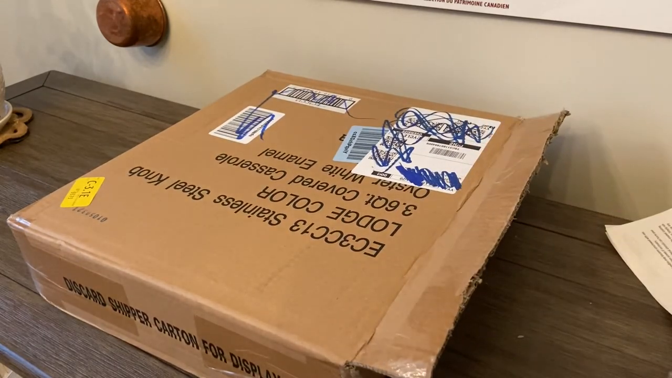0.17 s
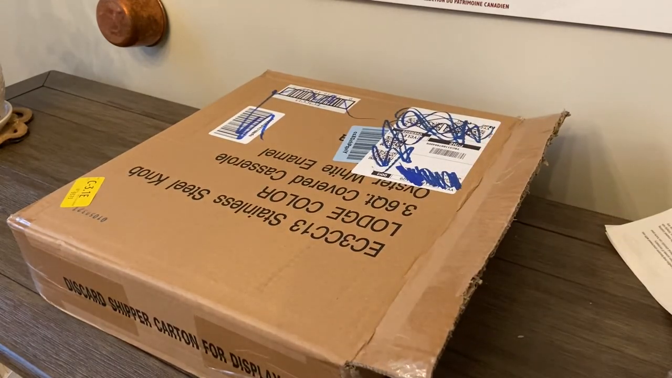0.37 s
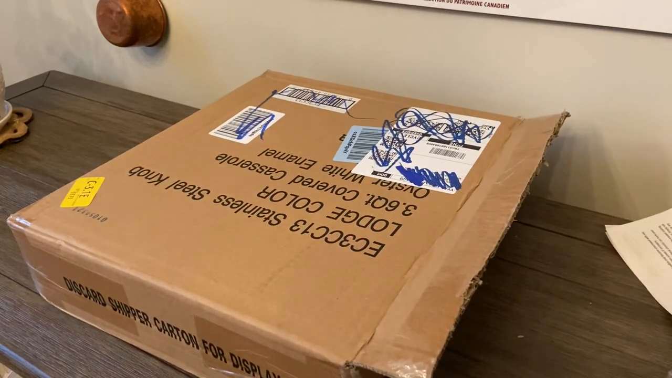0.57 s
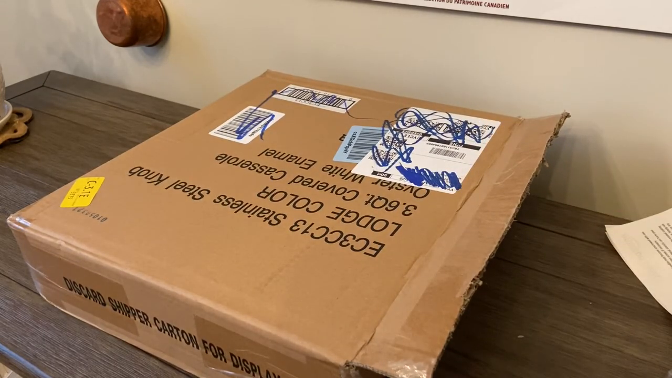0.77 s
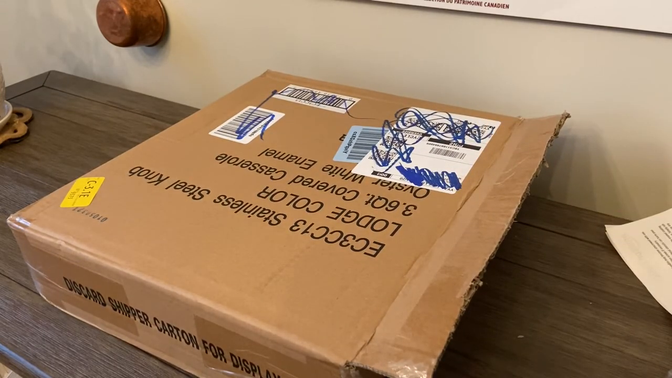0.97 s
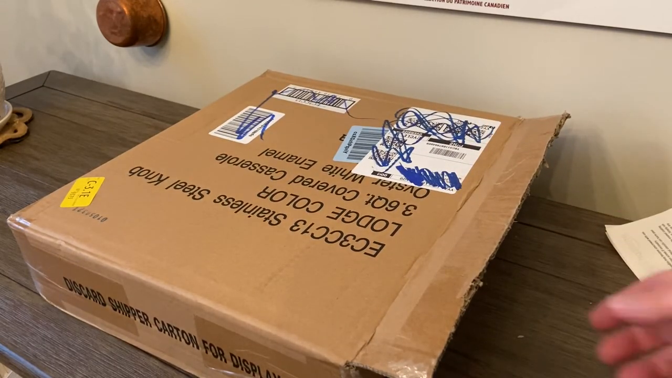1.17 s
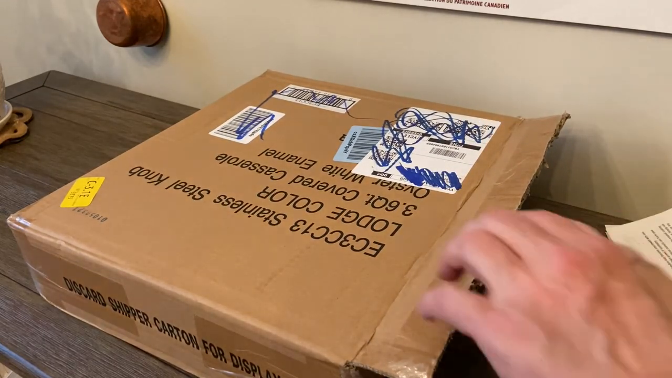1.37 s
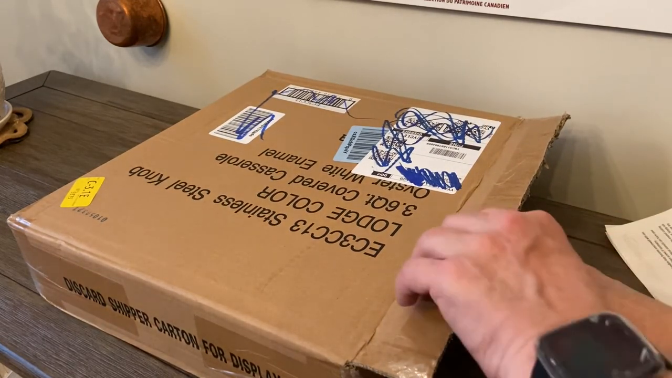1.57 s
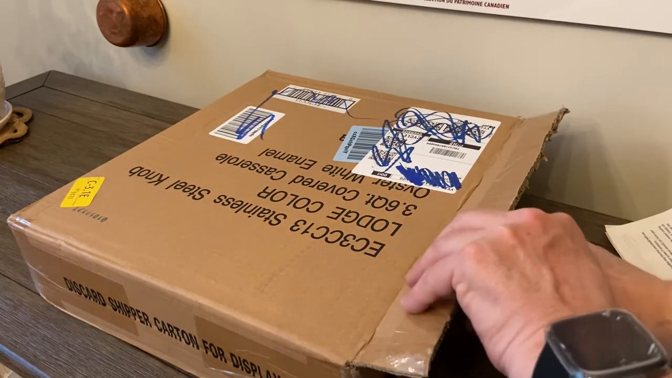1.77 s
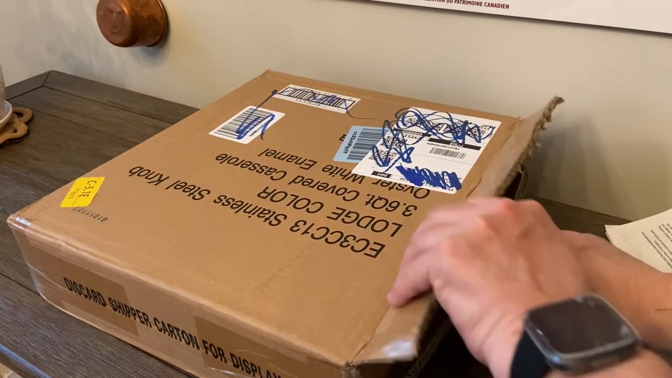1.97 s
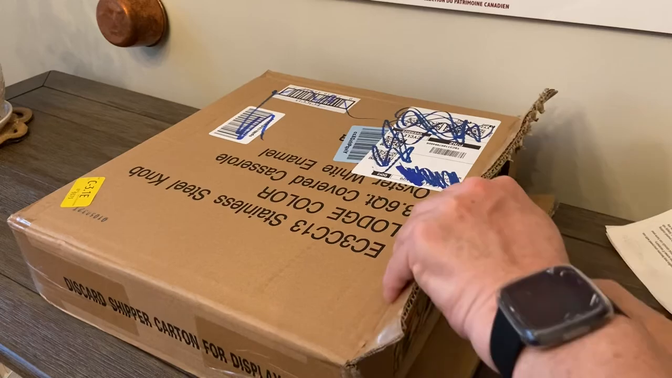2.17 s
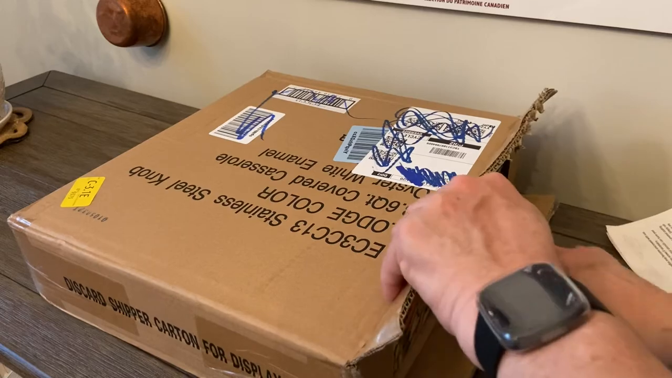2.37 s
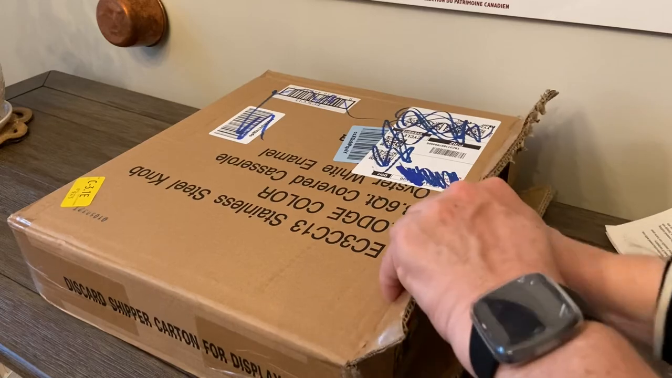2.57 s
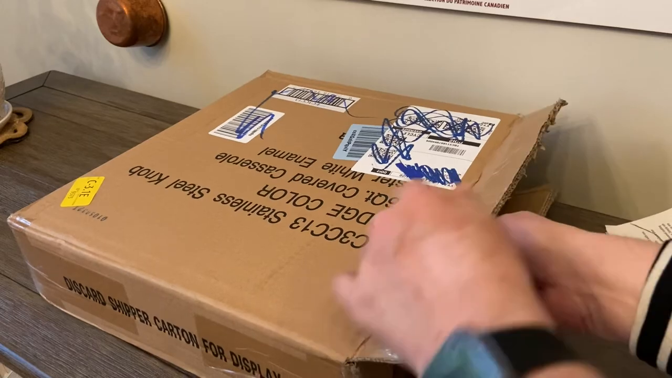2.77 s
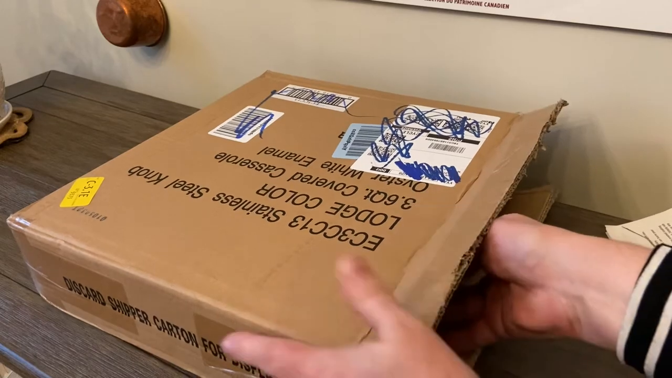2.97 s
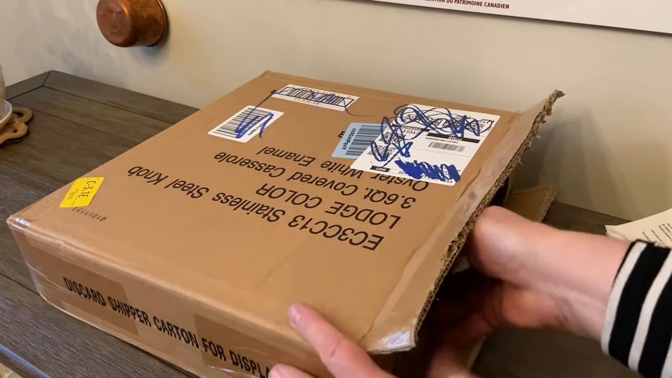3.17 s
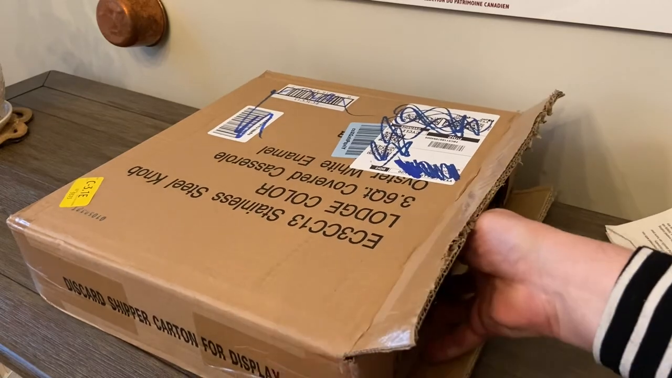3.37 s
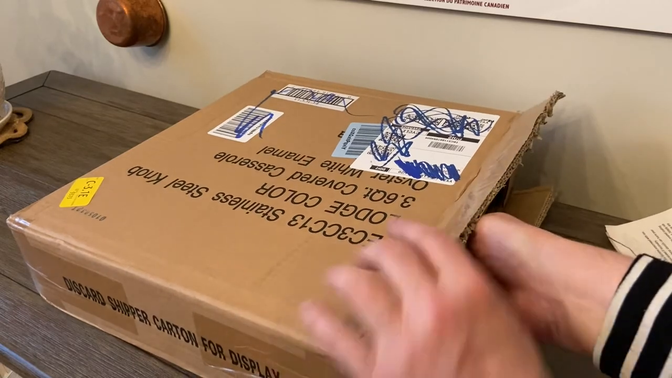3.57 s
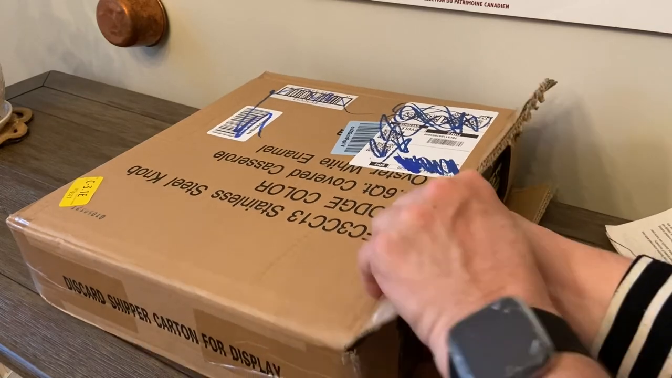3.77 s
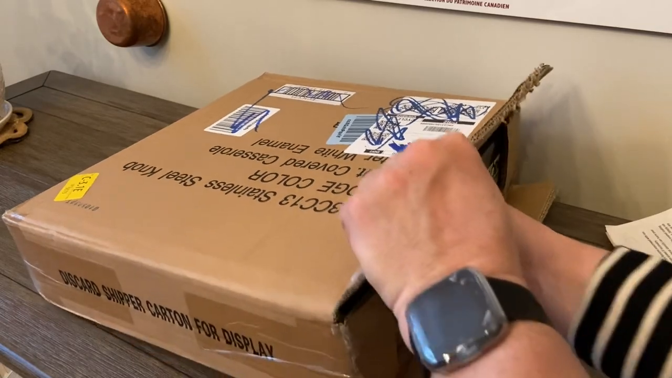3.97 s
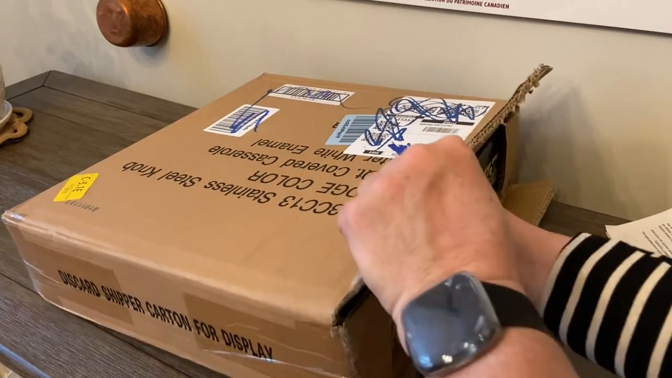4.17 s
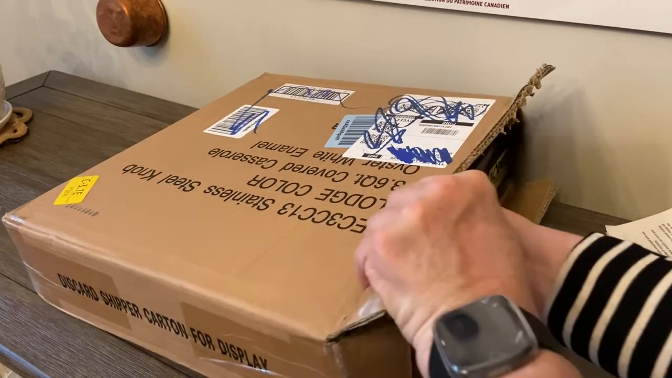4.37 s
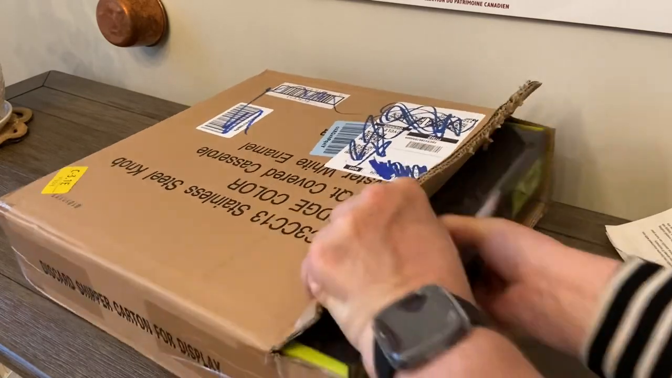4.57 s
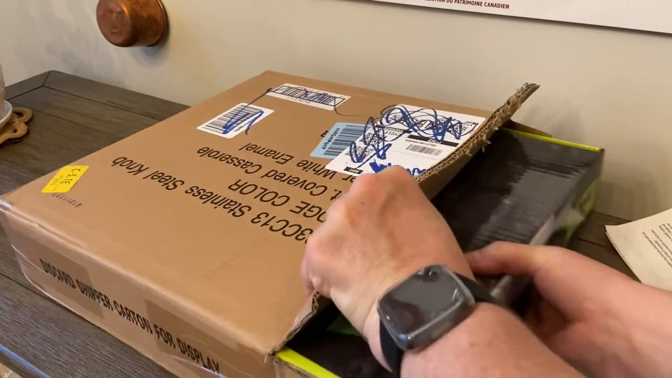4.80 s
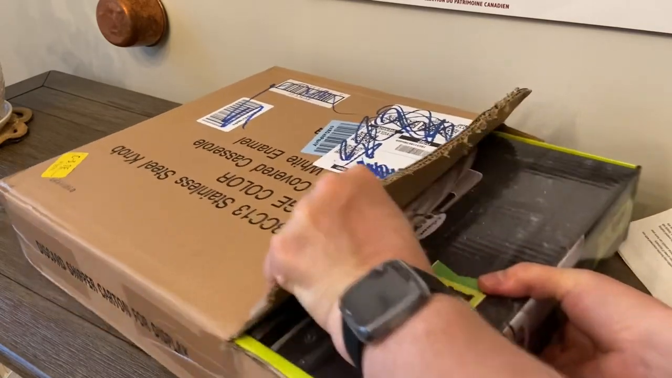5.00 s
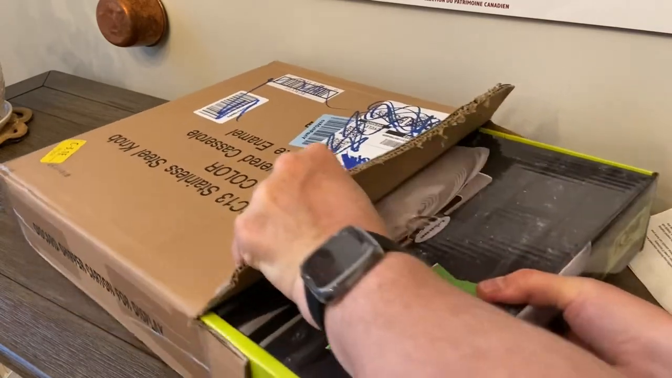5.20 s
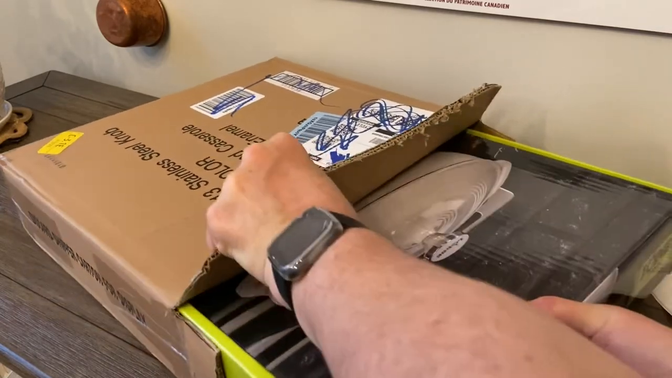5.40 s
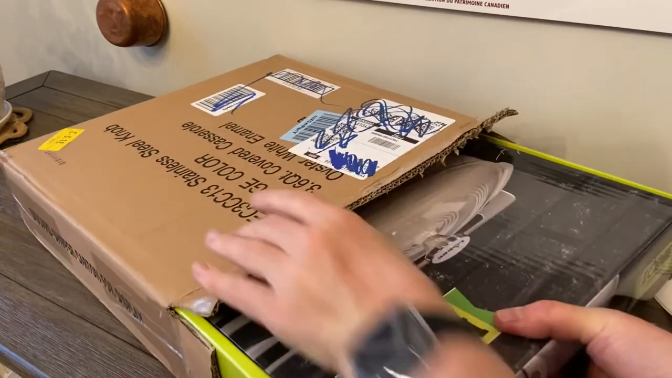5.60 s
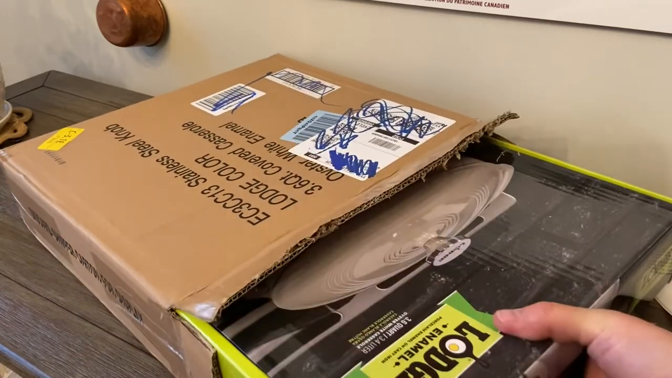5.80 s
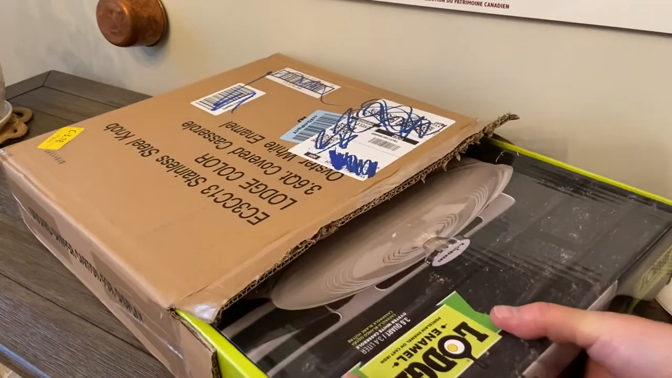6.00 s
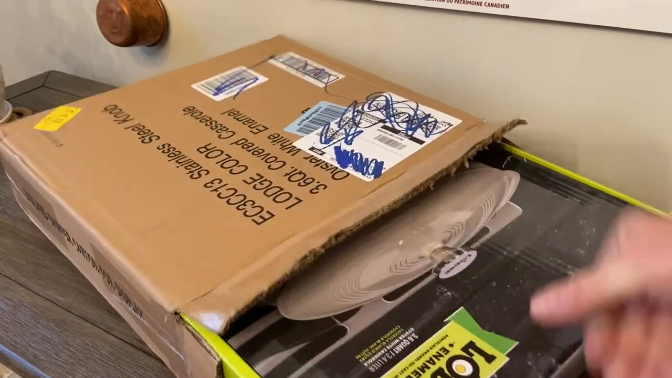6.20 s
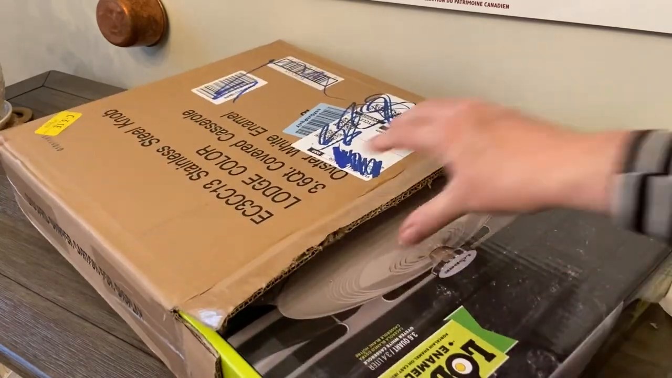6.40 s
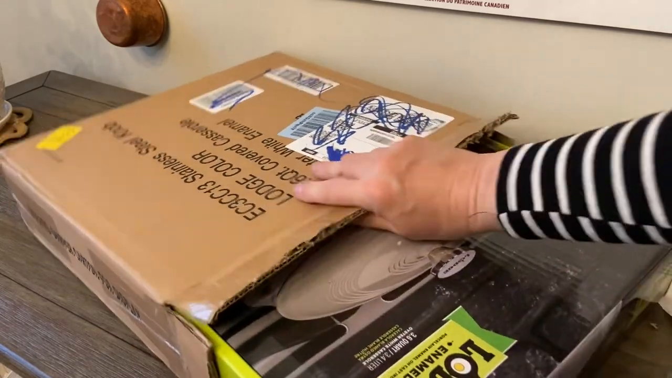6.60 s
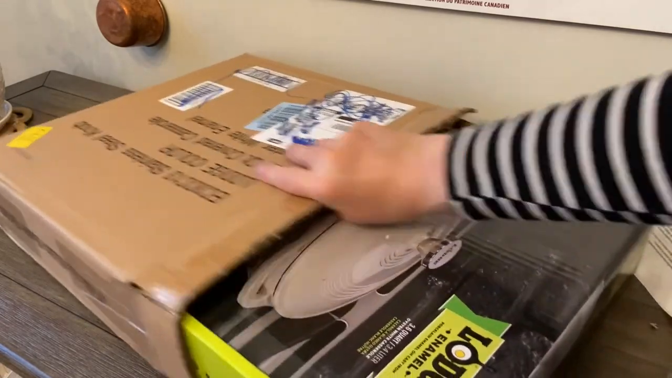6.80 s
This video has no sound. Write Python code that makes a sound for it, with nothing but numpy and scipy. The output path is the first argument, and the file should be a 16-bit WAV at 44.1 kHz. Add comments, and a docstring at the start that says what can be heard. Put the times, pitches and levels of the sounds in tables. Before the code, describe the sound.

Close stereo sound in a small quiet room: after a faint bump and light rustling, hands grip a stiff cardboard carton and its glued flap bursts with a sharp, overloaded crack and thud. Rubbing, snaps and creaks follow, then a heavy inner box jerks free, scrapes out in surges, and lands with deep booming thuds before a final firm rub and thump.

```python
"""Opening a carton on a table.

A corrugated carton on a wooden table, heard in stereo, close up, in a small room. Hands rub the card
(dense fibre catches), the glued flap bursts (noise-burst snaps, crackles), card creaks (plucked resonances),
and a heavy boxed pot is dragged out (scrape in surges) and set down with deep thuds (panel shoves plus
table modes) that clip at full scale."""
import sys
import numpy as np
from scipy import signal
from scipy.fft import rfft, irfft, next_fast_len
from scipy.io import wavfile
from scipy.ndimage import uniform_filter1d, map_coordinates

SR = 44100
rng = np.random.default_rng(int(sys.argv[2]) if len(sys.argv) > 2 else 0)


def write(x):
    x = np.atleast_2d(x).T
    wavfile.write(sys.argv[1], SR, np.round(np.clip(x, -1, 1) * 32767).astype(np.int16))

N = 302085


def amp(db):
    """Decibels to gain."""
    return 10 ** (np.asarray(db) / 20)


def unit(x):
    """x at rms 1."""
    return x / np.sqrt(np.mean(x ** 2) + 1e-20)


def along(points, hz):
    """(Hz, value) points interpolated on a log-frequency axis."""
    f, v = np.transpose(points)
    return np.interp(np.log(hz + 1), np.log(f + 1), v)


def curves(rows):
    """One value per sample for each column after the time; -120 before the first row."""
    s, *cols = np.transpose(rows)
    return [np.interp(np.arange(N) / SR, s, c, left=-120) for c in cols]


def wobble(rate):
    """Smooth random curve, rate knots a second."""
    knots = rng.standard_normal(int(N * rate / SR) + 4)
    return map_coordinates(knots, [np.arange(N) * rate / SR])


def filtered(x, response):
    """x times a response of frequency."""
    m = next_fast_len(N + SR // 2)
    return irfft(rfft(x, m) * response(np.fft.rfftfreq(m, 1 / SR)), m)[..., :N]


def coloured(x, spectrum):
    """x filtered by a (Hz, dB) spectrum, at rms 1."""
    return unit(filtered(x, lambda hz: amp(along(spectrum, hz))))


def noise():
    """White noise; frontal and sideways rows."""
    return rng.standard_normal((2, N))


def above(hz, low_hz):
    """High-pass gain, third power of frequency below low_hz."""
    return hz ** 3 / np.hypot(hz ** 3, low_hz ** 3)


TREBLE_HZ = 6600


def lifted(x, gain):
    """x with its treble scaled by a gain that changes in time."""
    return x + (gain - 1) * filtered(x, lambda hz: above(hz, TREBLE_HZ))


def add(track, s, sound):
    """Mix a sound into the track from time s."""
    part = track[..., max(round(s * SR), 0):][..., :sound.shape[-1]]
    part += sound[..., :part.shape[-1]]


# quiet room colour: f/Hz, level/dB per Hz
QUIET_COLOUR = [(13, -58.5), (22, -13), (91, -8), (123, -13), (149, -11), (279, -27), (328, -16),
                (397, -29.5), (443, -31.5), (615, -38.5), (1320, -45.5), (7180, -57.5), (8690, -56),
                (15000, -56)]
QUIET_DB = -43.5


def quiet_room():
    """Steady coloured noise of the room at rest."""
    return amp(QUIET_DB) * coloured(noise(), QUIET_COLOUR)


CARD_DAMPS_HZ = 1900  # soft card swallows the treble of a blow


def push(bright_hz, low_hz, lag=0.1252, slope=2.7, hollow=0.99, hollow_hz=270, ring_t60=0.053,
         build_s=0.0022):
    """One shove of a card panel, frontal peak 1; bending waves carry the highs ahead of the lows."""
    t = np.arange(2 ** 13) / SR
    hz = np.fft.rfftfreq(len(t), 1 / SR)
    rolloff = np.sqrt(1 + (hz / bright_hz) ** (2 * slope))
    gain = above(hz, low_hz) / rolloff * above(CARD_DAMPS_HZ, hz)
    # the hollow carton's dense, damped modes
    ring = rng.standard_normal((2, len(t))) * amp(-60 * t / ring_t60) * (1 - np.exp(-t / build_s))
    front, sides = rfft(ring) / np.linalg.norm(ring[0])
    share = np.clip(hollow, 0, 1) * hz ** 2 / (hz ** 2 + hollow_hz ** 2)
    body = np.array([np.sqrt(1 - share ** 2) + share * front, amp(-2.5) * sides])
    dispersion = np.exp(-2j * np.pi * 2 * lag * np.sqrt(hz))
    wave = irfft(gain * body * dispersion)
    return wave / np.abs(wave[0]).max()


# blows on carton and table: t/s, push level/dB, brightness f/Hz, boom level/dB re push (before BOOM_OFFSET_DB)
BLOWS = [(0.469, -26.5, 550, 5.5), (1.66, -16.5, 614, -16), (1.71, -23.5, 704, 4), (1.846, -29, 1800, -18),
         (1.861, -27, 1600, -15), (1.964, 0, 760, -15), (1.971, 3.5, 150, -8), (1.997, 0.5, 165, -13),
         (2.012, -1, 393, -7.5), (2.080, -11, 110, -12), (2.383, -29.5, 1300, -8), (2.407, -20.5, 600, 2),
         (2.424, -21, 95.5, -2), (2.59, -23.5, 706, 1), (2.674, -14.5, 800, -11), (2.683, -11.5, 210, -8.5),
         (2.962, -26, 259, -2), (3.02, -19, 1400, 6), (3.218, -33, 1000, -9), (3.252, -18.5, 230, -6),
         (3.278, -16.5, 1180, -18), (3.588, -22, 900, -14), (3.71, -18, 298, -6.5), (3.728, -21, 199, -8),
         (3.787, -19, 120, -2.5), (3.824, -24, 1600, -19), (3.892, -23, 220, -6), (4.007, -20.5, 1310, -19),
         (4.181, -18, 810, -8), (4.202, -18, 1800, -25), (4.481, -2.5, 440, -30), (4.491, -2, 205, -26),
         (4.738, -20, 1100, -20), (4.752, -15, 300, -12.5), (5.068, -22, 433, -16.5),
         (5.376, -20, 756, -21.5), (5.474, -25, 85, -6), (5.699, -32.5, 1026, 10), (5.881, -22, 280, -2),
         (5.925, -26.5, 500, -10), (6.035, -12, 515, -4), (6.077, -8, 910, -4), (6.085, 6, 131, -6),
         (6.127, -8, 830, -13), (6.131, 2.5, 149, -4), (6.176, -17.5, 480, -12), (6.406, -24.5, 497, 5),
         (6.549, -13, 1120, -14), (6.556, -1.5, 183, -12), (6.779, -2.5, 418, -25), (6.789, 5, 176, -18)]
# modes of the loaded carton on the table: f/Hz, level/dB (before per-blow scatter), t60/s
TABLE_MODES = [(53, -4, 0.2), (65.1, 4, 0.48), (103.4, -4.5, 0.47), (117.4, 2, 0.35), (143.8, 7, 0.11),
               (177, -9.5, 0.36), (210.3, -15.5, 0.46), (289, -19, 0.35), (328.4, -7.5, 0.15),
               (372, -10.5, 0.15), (466, -19, 0.15)]
BOOM_OFFSET_DB, MODE_SCATTER_DB = -5.5, 2.54
LOW_EDGE_HZ, EDGE_AT_HZ, EDGE_POWER = 111, 510, 0.49  # a duller blow moves more mass and reaches lower


def knocks(swell_s=0.0043, delay_s=0.00605):
    """Each blow shoves a panel, then the heavy carton booms on the table."""
    out, t = np.zeros((2, N)), np.arange(SR // 2) / SR
    hz, level, t60 = np.transpose(TABLE_MODES)
    decay = amp(level[:, None] - 60 * t / t60[:, None])
    modes = np.sin(2 * np.pi * hz[:, None] * t) * decay * (1 - np.exp(-t / swell_s))
    strengths = amp(MODE_SCATTER_DB * rng.standard_normal((len(BLOWS), len(TABLE_MODES))))
    for (s, db, bright_hz, boom_db), strength in zip(BLOWS, strengths):
        low_hz = LOW_EDGE_HZ * (bright_hz / EDGE_AT_HZ) ** EDGE_POWER
        add(out, s, amp(db) * push(bright_hz, low_hz))
        boom = (strength * above(hz, low_hz)) @ modes
        add(out[0], s + delay_s, amp(db + boom_db + BOOM_OFFSET_DB) * boom)
    return out


# stick-slip runs: t/s, length/s, slips/s, initial level/dB, initial brightness f/Hz, low edge f/Hz, fade/dB
STICK_SLIPS = [(0.481, 0.115, 66, -22.5, 360, 100, 10.5), (4.208, 0.039, 105, -24, 1000, 560, 0),
               (4.336, 0.049, 160, -8, 153, 141, 6.5), (4.338, 0.041, 160, -17.5, 680, 450, 6),
               (4.407, 0.072, 130, -23, 1100, 450, 9), (4.742, 0.02376, 170, -13.5, 600, 260, 7),
               (5.444, 0.023, 193, -15, 704, 300, 3.5), (5.875, 0.017, 170, -21.5, 903, 330, 5.5)]


def judders(jitter=0.087, darken=0.29, size_spread_db=0.53):
    """A dragged surface sticks and lets go in a short, uneven run of shoves that fade and darken."""
    out = np.zeros((2, N))
    for s, length, rate, db, bright_hz, low_hz, fade_db in STICK_SLIPS:
        for k, (shift, size) in enumerate(rng.standard_normal((16, 2))):
            age = k / rate
            if age < length:
                lost_db = fade_db * age / length
                slip = push(bright_hz * amp(-darken * lost_db), low_hz, slope=2.42, hollow_hz=443,
                            ring_t60=0.043, build_s=0.001)
                level = amp(db + size_spread_db * size - lost_db)
                add(out, s + age + jitter * shift / rate, level * slip)
    return out


def grains(rate, spread_db):
    """Fibre catches at random moments, a few larger than the rest; frontal and sideways rows."""
    sizes = amp(spread_db * np.minimum(rng.exponential(size=N), 4))
    sizes = sizes * (rng.random(N) < rate / SR)
    return unit(sizes * rng.choice([-1, 1], (2, N)))


def patchy(x, depth_db):
    """As the contact moves, different panel resonances come and go."""
    z = signal.stft(x, nperseg=1024)[2]
    field = uniform_filter1d(rng.standard_normal(z.shape[1:]), size=4, axis=0)
    field = uniform_filter1d(field, size=7, axis=1)
    return unit(signal.istft(z * amp(depth_db * unit(field)), nperseg=1024)[1][:, :N])


# colour of breaking fibres, also under snaps(): f/Hz, level/dB per Hz
FIBRE_COLOUR = [(150, -47), (500, 4), (900, 1), (1800, 2), (2600, -3), (3800, -5.5), (6200, -2.5),
                (8500, -4), (12000, -5), (15500, -8)]


def crackle(rate, life_s=0.0028):
    """Sparse little fibre breaks, rate a second, at rms 1."""
    t = np.arange(2 ** 9) / SR
    hits = grains(rate=rate, spread_db=3.0)[0] ** 2
    power = signal.fftconvolve(hits, np.exp(-t / life_s))[:N]
    return coloured(np.sqrt(np.abs(power)) * noise(), FIBRE_COLOUR)


# panel murmur colour: f/Hz, level/dB per Hz
PANEL_COLOUR = [(90, -24), (160, 5), (280, -3.5), (410, 2.5), (620, 1), (770, -4.5), (930, -7.5),
                (1250, -10), (1800, -14.5), (3000, -34.5)]
TICKS_PER_S = 61  # stray fibres


def friction(spectrum, hiss, murmur, uneven_db, ridges_db, patchy_db, ticks_db):
    """Fibres catch and slip under uneven pressure while the panels murmur; hiss and murmur are gains."""
    pressure_db = uneven_db * wobble(45)
    catching = amp(ridges_db * wobble(320))  # the card's ridges roughen the sliding
    fibres = patchy(coloured(grains(rate=7000, spread_db=1.0), spectrum), depth_db=patchy_db)
    fibres = fibres + amp(ticks_db) * crackle(rate=TICKS_PER_S)
    panel = patchy(coloured(grains(rate=1200, spread_db=0), PANEL_COLOUR), depth_db=2.5)
    return catching * (hiss * fibres * amp(pressure_db) + murmur * panel * amp(1.65 * pressure_db))


# panel flexing colour: f/Hz, level/dB per Hz
FLEX_COLOUR = [(25, -51), (50, 1), (65, 4.5), (110, 3.5), (180, 2), (280, -11), (600, -42.5)]


def flexing():
    """Low rumble of bending panels, at rms 1."""
    return coloured(noise(), FLEX_COLOUR)


ATTACK_SHARE, RELEASE_DB_PER_S = 0.35, 289  # attack as a share of the length


def held(start, length):
    """Gain of one stroke: it gathers speed, holds and dies away."""
    age = np.arange(N) / SR - start
    attack = np.clip(age / (ATTACK_SHARE * length), 0, 1)
    return attack * amp(-RELEASE_DB_PER_S * np.clip(age - length, 0, 1))


# rub colour: f/Hz, level/dB per Hz
RUB_COLOUR = [(500, -9.5), (1000, -1.5), (2300, 1), (3500, -2.5), (5200, -4.5), (7500, -6), (12000, -7.5),
              (15500, -9)]
# hand strokes over the card: t/s, length/s, hiss level/dB, panel murmur level/dB, treble lift/dB
HAND_STROKES = [(0.945, 0.27, -49.5, -63.5, 3.5), (1.311, 0.0072, -43.5, -59, 5.5),
                (1.426, 0.054, -51.5, -49, 9.5), (1.489, 0.28, -45, -46.5, 3.5),
                (1.828, 0.027, -31.5, -34, 8), (1.975, 0.18, -37, -42, -15.5),
                (2.097, 0.16, -48, -51, -0.5), (2.295, 0.14, -42, -50.5, 2.5),
                (2.387, 0.034, -27, -30.5, 1.5), (2.414, 0.16, -39, -46.5, 4),
                (2.6, 0.17, -39.5, -45.5, 0.5), (2.771, 0.176, -49.5, -49, -1),
                (2.922, 0.096, -34, -38.5, 4), (3.06, 0.14, -44, -40.5, 1.5), (3.174, 0.083, -33.5, -37, 3),
                (3.416, 0.011, -40.5, -39, 4.5), (3.47, 0.32, -49, -47, -8), (3.569, 0.071, -36, -35.5, 2),
                (3.61, 0.27, -37, -40, 1), (3.853, 0.135, -34.5, -39.5, -1), (4.006, 0.087, -42, -41, -2),
                (4.109, 0.12, -40, -34.5, -1.5), (4.273, 0.053, -31, -51, 13), (5.556, 0.14, -47, -48, -7),
                (5.858, 0.168, -43, -34.5, 0.5), (6.01, 0.16, -36, -35, -0.5),
                (6.404, 0.14, -33, -34.5, 1.5), (6.542, 0.35, -33, -32.5, 3), (6.685, 0.16, -26, -25, 3)]
GRIP_START_S, GRIP_RISE_S, GRIP_HISS_DB, GRIP_MURMUR_DB = 0.59, 0.21, -56.5, -55  # steady faint rustle
HAND_FLEX_DB, FLEX_LAG_S = 5, 0.02  # rumble re lagged murmur


def hands():
    """Strokes over a faint steady rustle; the harder they press, the more the carton flexes and rumbles."""
    grip = np.clip((np.arange(N) / SR - GRIP_START_S) / GRIP_RISE_S, 0, 1)
    power = np.outer(amp([GRIP_HISS_DB, GRIP_MURMUR_DB, GRIP_HISS_DB]), grip) ** 2
    for start, length, hiss_db, murmur_db, lift_db in HAND_STROKES:
        levels = amp([hiss_db, murmur_db, hiss_db + lift_db])
        power += np.outer(levels, held(start, length)) ** 2
    hiss, murmur, treble = np.sqrt(power)
    rub = friction(RUB_COLOUR, hiss, murmur, uneven_db=1.5, ridges_db=1.13, patchy_db=3.5, ticks_db=-20.0)
    rub = lifted(rub, treble / (hiss + 1e-9))
    bend = filtered(murmur, lambda hz: 1 / (1 + 2j * np.pi * hz * FLEX_LAG_S))
    return rub + amp(HAND_FLEX_DB) * bend * flexing()


# glue and fibres snapping, edges ticking: t/s, level/dB, t60/s, pitch f/Hz
SNAP_EVENTS = [(0.842, -44, 0.19, 2480), (1.435, -37.5, 0.025, 2960), (1.627, -28.5, 0.018, 2980),
               (1.665, -27.5, 0.021, 2680), (1.819, -32, 0.022, 3000), (1.845, -22.5, 0.063, 6950),
               (1.866, -29, 0.009, 2000), (1.939, -20.5, 0.016, 9000), (1.952, -5.5, 0.035, 2650),
               (1.956, 3, 0.0087, 6150), (1.965, 5.5, 0.013, 2740), (1.969, -3, 0.025, 2700),
               (1.986, -2.5, 0.016, 6020), (2.011, -8, 0.02, 3600), (2.016, -18.5, 0.014, 2500),
               (2.038, -24, 0.012, 4000), (2.055, -25, 0.025, 2400), (2.224, -36, 0.011, 7200),
               (2.302, -31.5, 0.016, 5660), (2.384, -25, 0.02, 3500), (2.598, -28, 0.13, 7000),
               (2.678, -21.5, 0.04, 4500), (3.015, -10, 0.057, 6700), (3.021, -4, 0.019, 7160),
               (3.219, -22, 0.022, 2500), (3.241, -27, 0.02, 4100), (3.254, -10, 0.0058, 10100),
               (3.278, -19.5, 0.03, 4330), (3.435, -29, 0.028, 1800), (3.613, -14.5, 0.01, 4730),
               (3.641, -22, 0.0081, 5170), (3.659, -16.5, 0.012, 3730), (3.674, -24, 0.0096, 5500),
               (3.681, -16.5, 0.0116, 3280), (3.703, -15, 0.021, 3380), (3.715, -23.5, 0.021, 4940),
               (3.723, -25, 0.0117, 4000), (3.743, -22.5, 0.0083, 7000), (3.779, -10.5, 0.013, 2620),
               (3.826, -17, 0.012, 2200), (3.855, -28, 0.0068, 8520), (3.877, -23, 0.0094, 11000),
               (3.921, -25, 0.0128, 4800), (4.013, -30, 0.014, 2000), (4.199, -30, 0.0094, 9800),
               (4.247, -22.5, 0.0085, 11000), (4.259, -24, 0.009, 6500), (4.513, -17, 0.011, 2600),
               (4.567, -8.5, 0.0065, 2630), (4.579, -10.5, 0.01, 2770), (4.611, -25, 0.011, 2800),
               (4.673, -18, 0.01, 8700), (4.741, -22, 0.037, 1820), (5.378, -19.5, 0.012, 3950),
               (5.432, -29, 0.015, 9000), (5.437, -18, 0.02, 3180), (5.449, -17, 0.021, 3780),
               (5.459, -21.5, 0.022, 2500), (5.535, -34, 0.019, 2500), (5.640, -31, 0.0089, 6140),
               (5.876, -34.5, 0.025, 1800), (5.902, -35, 0.012, 3500), (5.959, -34, 0.012, 3500),
               (5.987, -33, 0.016, 1600), (6.038, -23.5, 0.017, 2010), (6.09, -21, 0.012, 1800),
               (6.132, -21, 0.015, 1700), (6.551, -21.5, 0.036, 1400)]
SNAP_RISE_S = 0.00077  # fibres give way almost at once


def snaps(focus_db=7.5, octaves=0.41, spread_db=3):
    """Each snap is a clump of breaking fibres, boosted at the pitch of the patch that gives way."""
    out, t = np.zeros((2, N)), np.arange(2 ** 13) / SR - .05  # 50 ms lead-in for the rise
    hz = np.fft.rfftfreq(len(t), 1 / SR)
    for s, db, t60, pitch_hz in SNAP_EVENTS:
        distance = np.log2((hz + 1) / pitch_hz) / octaves
        colour_db = along(FIBRE_COLOUR, hz) + focus_db * np.exp(-.5 * distance ** 2)
        fibres = rng.standard_normal((2, len(t))) * amp(spread_db * rng.standard_normal(len(t)))
        rise = np.exp(np.minimum(t, 0) / SNAP_RISE_S)
        force = amp(db) * rise * amp(-60 * np.maximum(t, 0) / t60)
        add(out, s + t[0], force * unit(irfft(rfft(fibres) * amp(colour_db))))
    return out


# card sliding on card: t/s, length/s, pitch f/Hz (before scatter and rise), resonance width/Hz, level/dB
CREAK_EVENTS = [(1.668, 0.06, 570, 89, -33), (1.846, 0.043, 800, 160, -39.5),
                (1.848, 0.028, 1660, 403, -36.5), (2.472, 0.067, 4840, 400, -38),
                (2.959, 0.065, 670, 250, -35), (3.037, 0.09, 1760, 90, -43.5),
                (3.166, 0.0215, 677, 130, -35), (4.206, 0.042, 715, 200, -24), (4.398, 0.022, 590, 90, -18),
                (4.484, 0.016, 940, 200, -21), (4.95, 0.052, 915, 80, -32.5),
                (6.748, 0.058, 2127, 160, -29)]
SLIPS_PER_S, OVERTONE_RATIO, OVERTONE_DB = 210, 1.8, -18


def creaks(jitter=0.346, scatter=0.027, rise=.03, spread_db=3):
    """Each slip plucks one resonance of the card; its pitch rises a little as the card tightens."""
    out, t = np.zeros((2, N)), np.arange(2 ** 12) / SR
    for s, length, pitch_hz, width_hz, db in CREAK_EVENTS:
        run = np.zeros(SR // 2)
        for k, (late, detune, size) in enumerate(rng.standard_normal((48, 3))):
            age = k / SLIPS_PER_S
            if age < length:
                bend = 1 + scatter * detune + rise * (age / length - .5)
                phase = 2 * np.pi * pitch_hz * bend * t
                tone = np.sin(phase) + amp(OVERTONE_DB) * np.sin(OVERTONE_RATIO * phase)
                ring = tone * np.exp(-np.pi * width_hz * t)
                add(run, age + jitter * late / SLIPS_PER_S, amp(spread_db * size) * ring)
        add(out[0], s, amp(db) * run * np.sqrt(length * SR) / np.linalg.norm(run))
    return out


# runs of tearing fibres: t/s, length/s, breaks/s, level/dB
TEAR_RUNS = [(1.832, 0.03, 780, -41), (1.975, 0.067, 310, -29.5), (2.38, 0.029, 480, -37),
             (3.001, 0.011, 1100, -27), (3.665, 0.056, 240, -33.5), (3.886, 0.076, 200, -33.5),
             (4.32, 0.05, 270, -28), (4.405, 0.07, 370, -23.5)]


def tears():
    """Creases and edges of the card give way in runs of crackles."""
    return sum(amp(db) * held(start, length) * crackle(rate=rate, life_s=0.0017)
               for start, length, rate, db in TEAR_RUNS)


# boxed pot jerks free, slides in surges, stops: t/s, scrape level/dB, panel murmur level/dB, treble lift/dB
DRAG_COURSE = [(4.24, -35, -48.5, -4), (4.30, -40.5, -33.5, 2), (4.36, -19.5, -26, 4.5),
               (4.395, -23, -28, 3), (4.42, -19, -24, 4), (4.475, -16.5, -23.5, 3), (4.505, -22, -26, -2),
               (4.56, -26, -28.5, -3), (4.66, -31.5, -32, 0.5), (4.72, -28, -34.5, -3.5),
               (4.805, -31.5, -29, -2), (4.85, -25, -33, -1), (4.97, -28, -31, -3.5),
               (5.08, -32.5, -35, -2), (5.14, -28, -34, 1), (5.2, -28, -32, -1), (5.28, -34, -35.5, 0.5),
               (5.37, -38, -33.5, 2.5), (5.66, -70, -48, 6)]
# scrape colour: f/Hz, level/dB per Hz
SCRAPE_COLOUR = [(530, -59), (900, 3), (1040, -6.5), (1140, -5), (1360, -7), (2140, -5), (2590, -4.5),
                 (3520, -8.5), (5950, -9.5), (6870, -9), (7800, -7), (9000, -17.5), (12000, -12.5),
                 (15500, -16.5)]
GRIT_PER_S, GRIT_DB = 520, -6.5  # coarse catches, re scrape
DRAG_FLEX_DB = -6  # rumble re murmur


def drag():
    """The heavy box scrapes along the carton in surges; the panels murmur and rumble under its weight."""
    moving = np.arange(N) / SR < DRAG_COURSE[-1][0]
    hiss, murmur, lift = amp(curves(DRAG_COURSE)) * moving
    scrape = friction(SCRAPE_COLOUR, hiss, murmur, uneven_db=1.0, ridges_db=0.8, patchy_db=3.5, ticks_db=-21)
    grit = amp(GRIT_DB) * hiss * coloured(grains(rate=GRIT_PER_S, spread_db=1.3), SCRAPE_COLOUR)
    return lifted(scrape + grit, lift) + amp(DRAG_FLEX_DB) * murmur * flexing()


# room decay: f/Hz, t60/s
ROOM_DECAY = [(60, 0.73), (400, 0.47), (1200, 0.4), (4000, 0.33), (8000, 0.17), (14000, 0.18)]


def room(x, gap_s=0.00051, count=18):
    """Two unrelated noise tails with frequency-dependent decay, crossfading through count pairs over time."""
    out, place = np.zeros((2, N)), np.linspace(0, count - 1, N)
    for k in range(count):
        hz, t, z = signal.stft(rng.standard_normal((2, SR * 2 // 3)), SR, nperseg=256)
        decay = amp(-60 * t / along(ROOM_DECAY, hz)[:, None])
        tail = signal.istft(z * decay, SR, nperseg=256)[1]
        tail *= 1 - np.exp(-(np.arange(tail.shape[1]) / SR / gap_s) ** 2)
        near = np.flatnonzero(np.abs(place - k) < 1)
        part = x[near] * np.cos(np.pi / 2 * (place[near] - k))
        for side, answer in zip(out, tail):
            add(side, near[0] / SR, signal.fftconvolve(part, answer / np.linalg.norm(answer)))
    return out


# channel likeness: f/Hz, likeness (interpolated, then clipped to -1..1)
LIKENESS = [(60, 2), (180, 0.8), (300, 0.86), (500, 0.31), (2000, 0.39), (4500, 0.7), (6300, 0.66),
            (7500, 0.46), (8600, 3.9), (9500, 1.1), (10700, 0.3), (12300, 1.3), (13900, 0.5), (14800, 1.16)]
# channel balance: f/Hz, L-R level/dB
CHANNEL_BALANCE = [(60, 0.5), (250, -1), (600, -3), (1300, -0.3), (3000, -3), (5000, -3.5), (7500, 0)]
# channel phase: f/Hz, left lead/rad
LEFT_LEAD = [(60, -.17), (200, -.35), (450, -.45), (1500, -.1), (5300, -.35), (6750, 0), (7500, 1.45),
             (8600, 3.05), (9700, 3.35), (11800, 6.2), (13000, 6.35), (14700, 9.35)]


def stereo(paths):
    """Frontal and sideways sound to left and right; the capsules turn the treble in and out of phase."""
    def turn(hz):
        return np.arccos(np.clip(along(LIKENESS, hz), -1, 1)) / 2

    def halves(points, hz):
        return np.outer([.5, -.5], along(points, hz))

    def capsules(hz):
        return amp(halves(CHANNEL_BALANCE, hz)) * np.exp(1j * halves(LEFT_LEAD, hz))

    mid, side = filtered(paths, lambda hz: np.array([np.cos(turn(hz)), np.sin(turn(hz))]))
    return filtered(np.array([mid + side, mid - side]), capsules)


# hands move across the carton: t/s, extra L-R level/dB of sliding, snaps and tears
HAND_PLACE = [(1.0, -1.5), (1.95, 0), (2.7, -0.5), (3.0, 0.5), (3.7, -1), (4.5, 0.3), (5.2, -0.1),
              (6.7, -0.25)]


def placed(channels):
    """Pan left and right channels along the hands' path."""
    balance_db = np.interp(np.arange(N) / SR, *np.transpose(HAND_PLACE))
    return amp(np.outer([.5, -.5], balance_db)) * channels


def scene():
    """The carton's sounds, the room's answer and its quiet noise."""
    quiet = quiet_room()
    thud = knocks() + judders()
    rub = hands() + drag()
    crack = snaps() + tears()
    creak = creaks()
    send = amp(-13.0) * rub[0] + amp(-9.5) * crack[0] + amp(-11.5) * thud[0] + amp(-8.0) * creak[0]
    tails = room(filtered(send, lambda hz: above(hz, low_hz=85)))
    return placed(stereo(rub + crack)) + stereo(thud + creak + tails + quiet)


TOP_HZ = 15750  # centre of a 500 Hz wide cutoff ramp


def record(dry):
    """Clip at full scale, then band-limit."""
    return filtered(np.clip(dry, -1, 1), lambda hz: np.clip((TOP_HZ - hz) / 500 + .5, 0, 1))


dry = scene()
out = record(dry)
write(out)
```